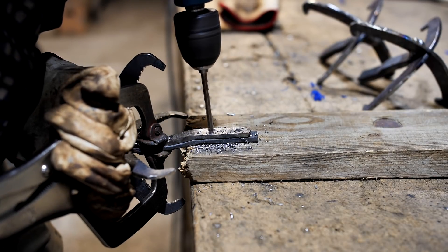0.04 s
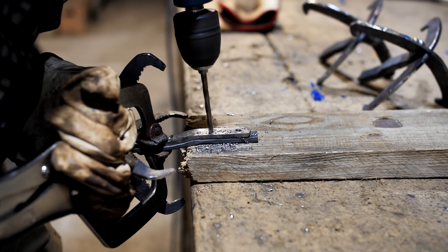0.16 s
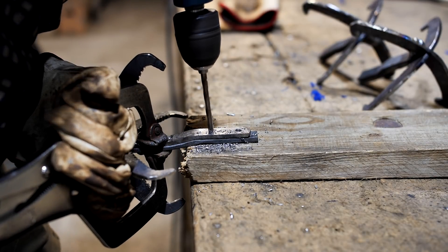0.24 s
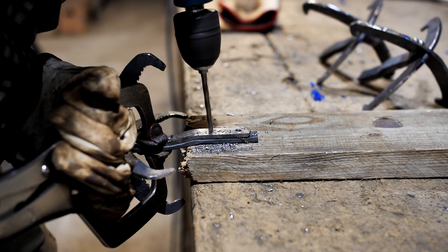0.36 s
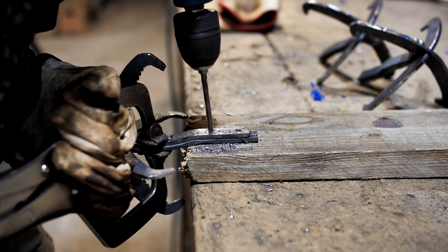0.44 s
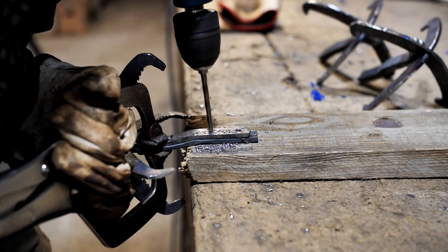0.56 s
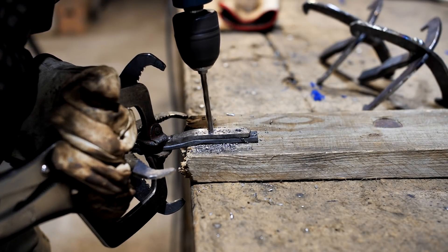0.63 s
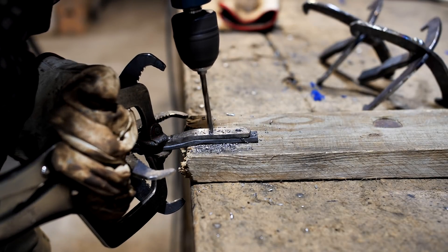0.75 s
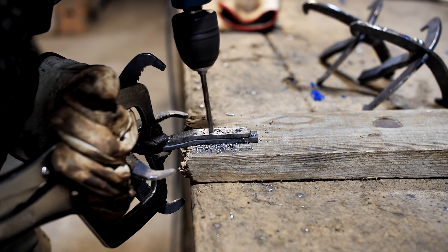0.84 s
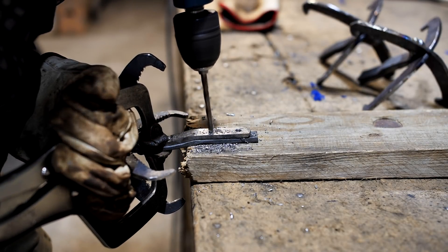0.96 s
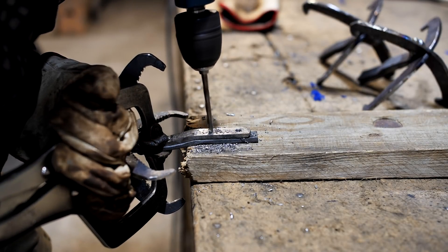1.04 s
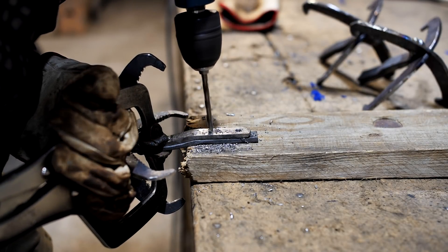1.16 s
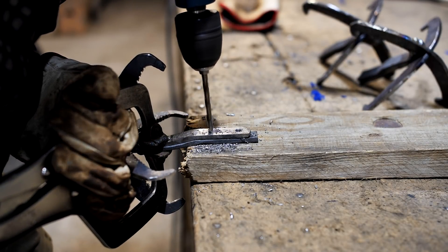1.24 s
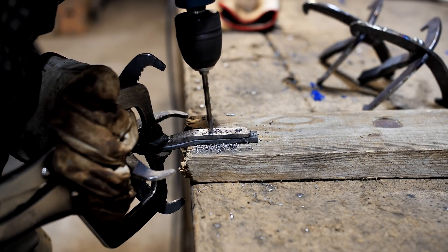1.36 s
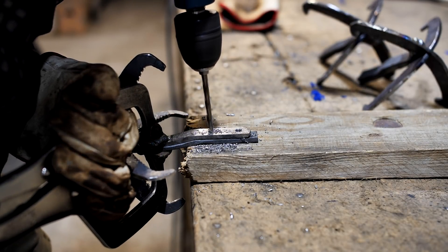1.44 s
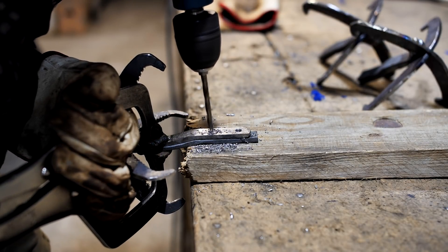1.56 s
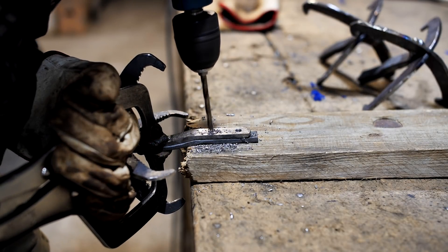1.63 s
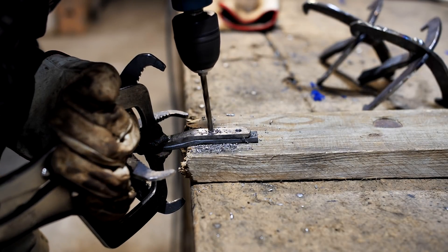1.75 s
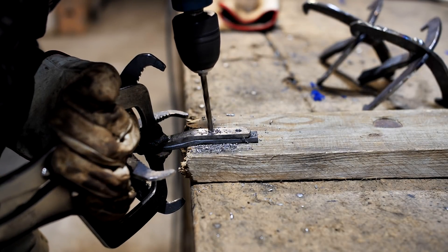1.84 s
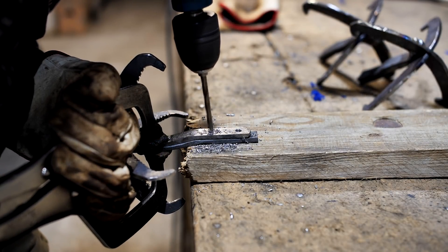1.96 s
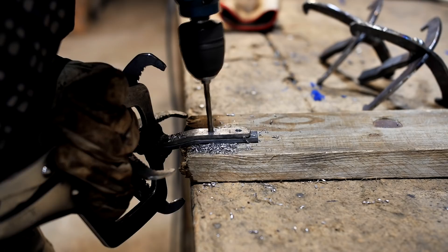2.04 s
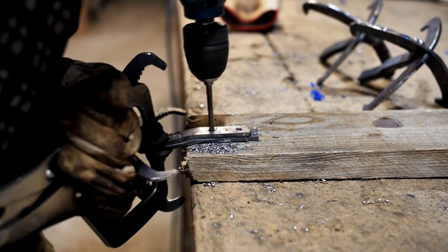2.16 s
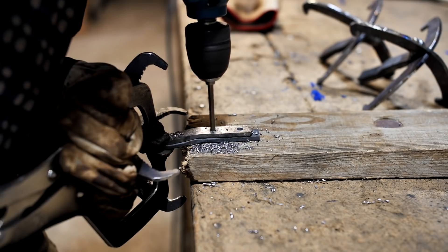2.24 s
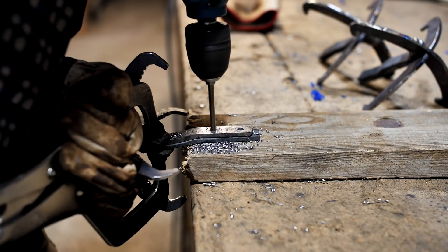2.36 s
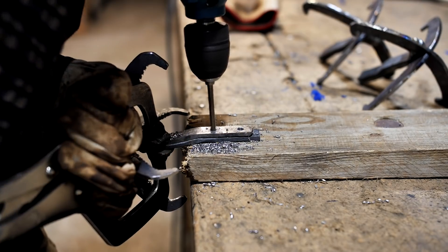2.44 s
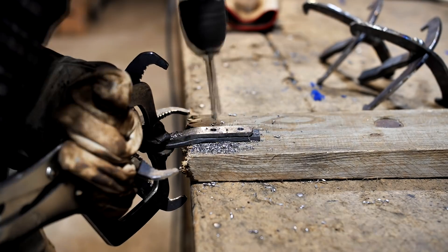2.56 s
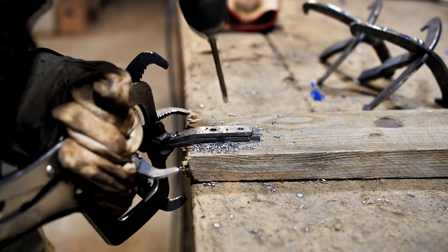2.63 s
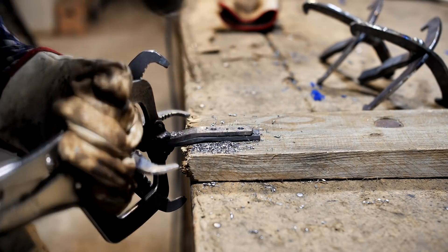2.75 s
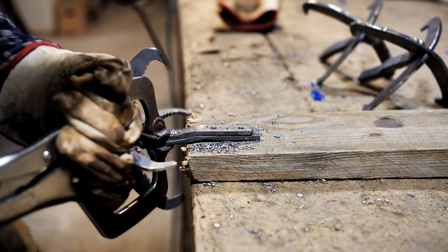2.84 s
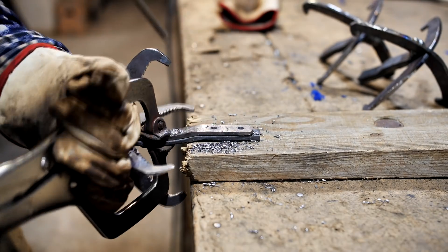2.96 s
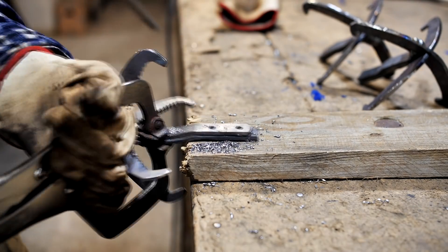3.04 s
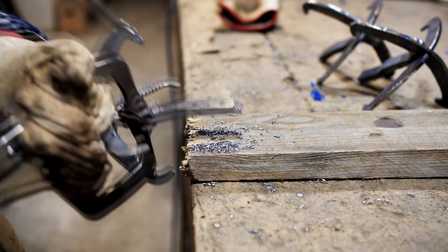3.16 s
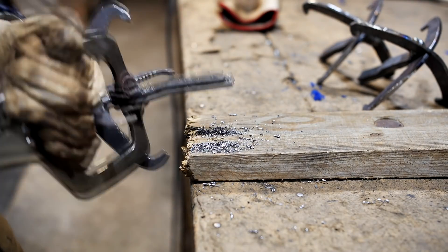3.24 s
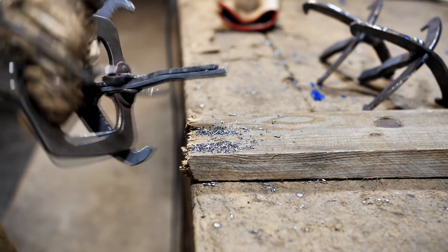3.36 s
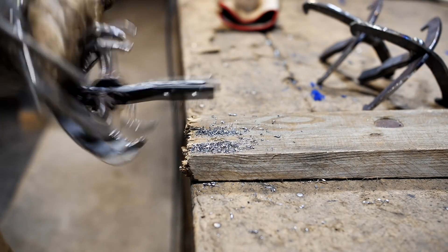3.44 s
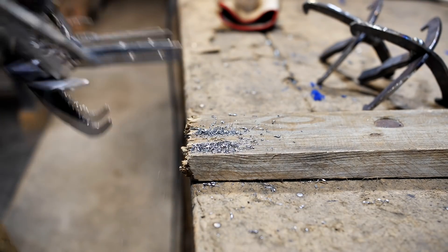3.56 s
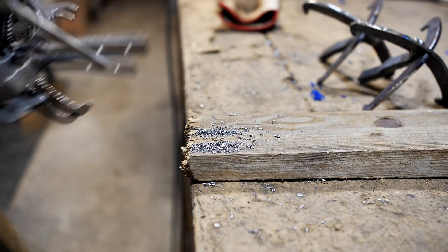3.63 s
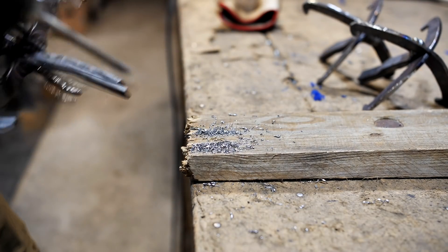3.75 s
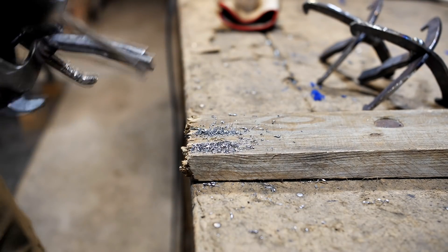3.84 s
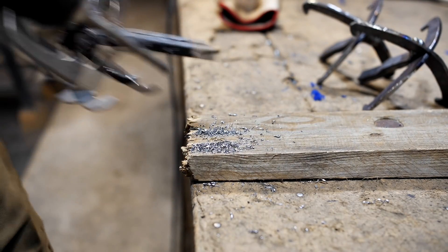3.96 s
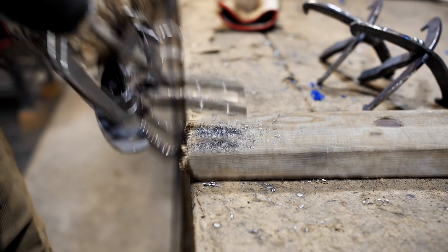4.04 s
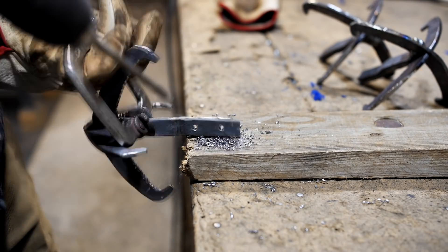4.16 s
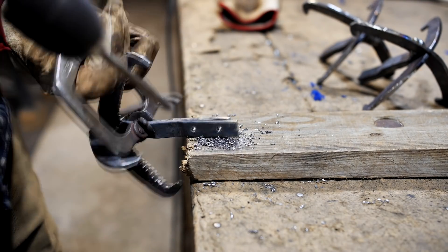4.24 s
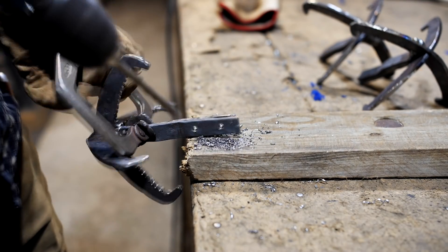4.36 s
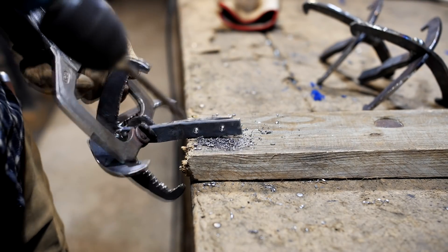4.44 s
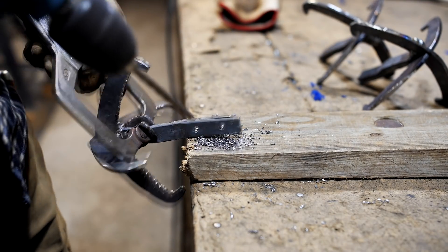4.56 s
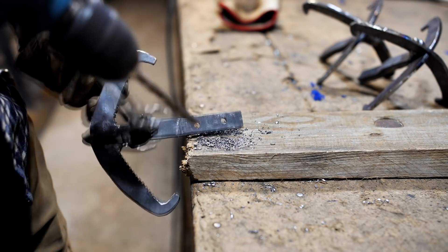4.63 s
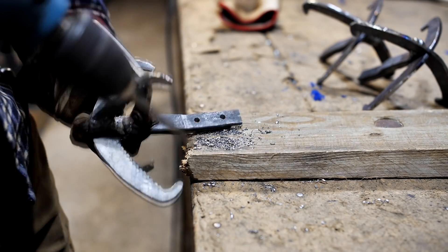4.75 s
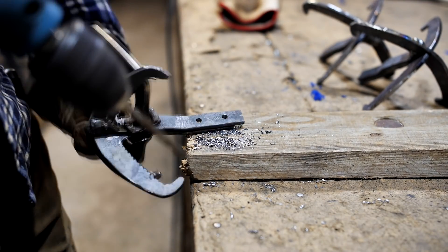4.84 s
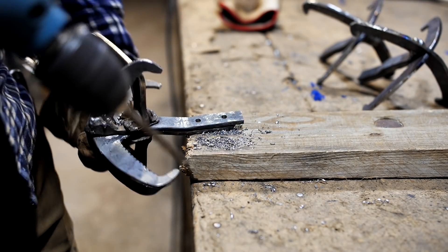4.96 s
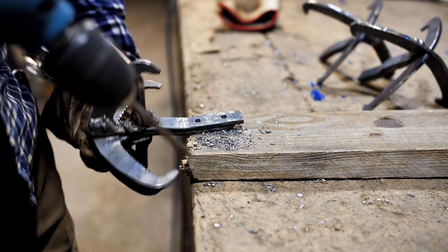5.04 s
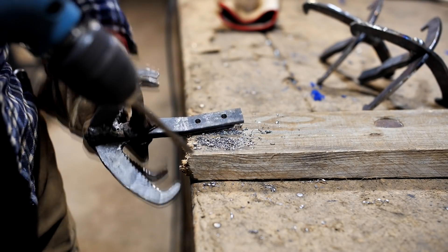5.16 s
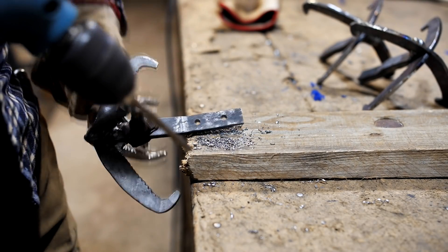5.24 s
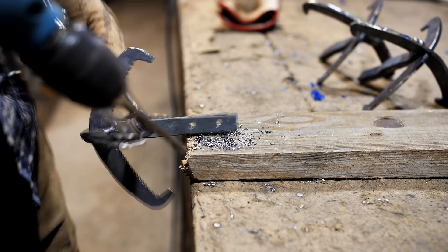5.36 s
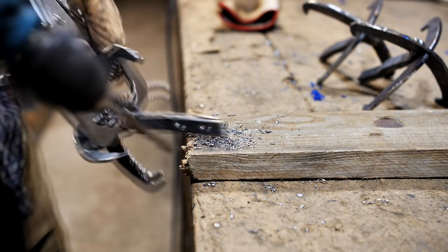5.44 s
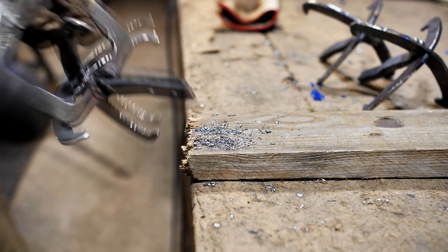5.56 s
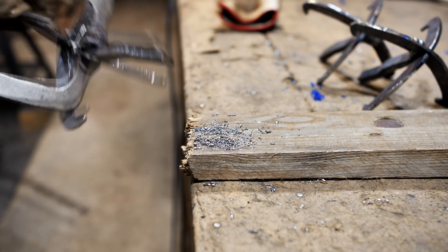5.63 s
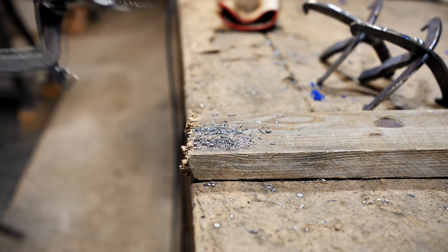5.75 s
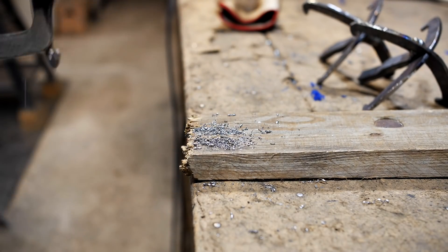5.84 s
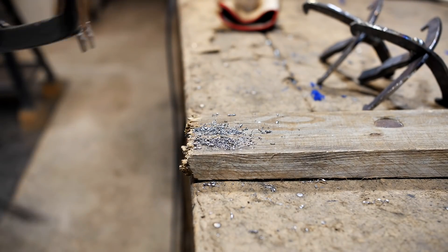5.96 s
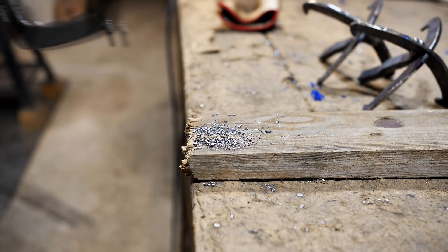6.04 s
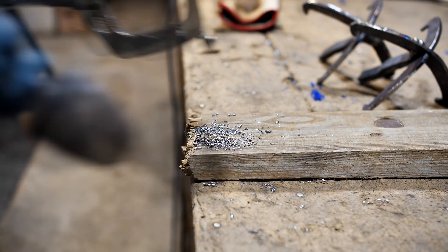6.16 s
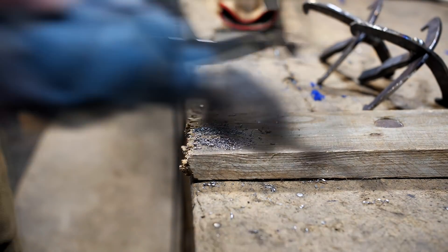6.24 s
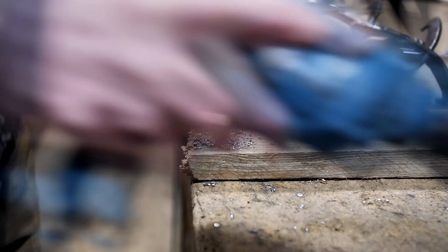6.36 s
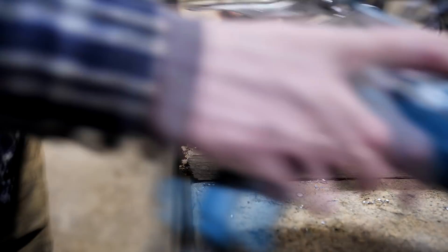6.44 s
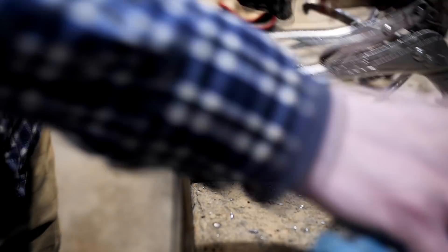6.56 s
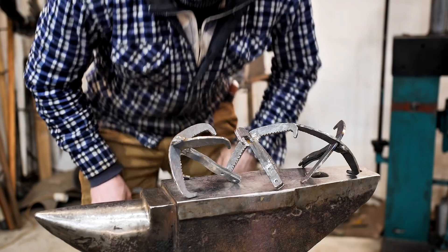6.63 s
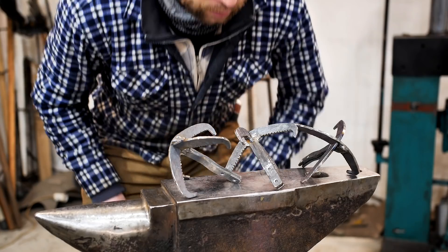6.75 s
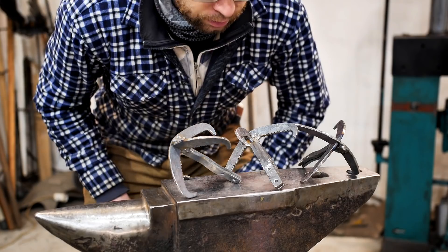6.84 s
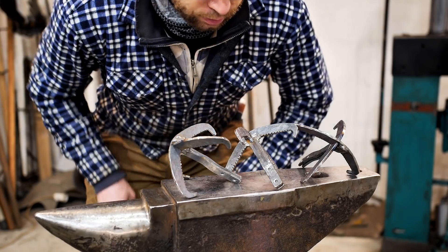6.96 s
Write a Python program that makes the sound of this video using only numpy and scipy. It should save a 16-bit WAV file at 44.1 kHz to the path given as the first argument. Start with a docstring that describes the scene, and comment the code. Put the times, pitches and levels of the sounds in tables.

```python
"""An electric hand drill bores through a steel strip held on a wooden bench, over a steady murmur and a low rumble.
First the gears whine and the bit grinds under load, with a brief moan as it takes hold; it breaks through and is lifted.
Then the drill coasts: the commutator sings a falling comb, loose gears rattle and the work is knocked onto the bench.
The last gear teeth drop as the motor stops; then a cut to the ringing, reverberant tail of a bang, and iron parts tick.
Modes and shaped noise make the impacts and friction, sums of sines the gear and commutator lines; one microphone."""
import sys
import numpy as np
from scipy import signal
from scipy.fft import rfft, irfft, next_fast_len
from scipy.io import wavfile
from scipy.ndimage import uniform_filter1d

SR = 44100
rng = np.random.default_rng(int(sys.argv[2]) if len(sys.argv) > 2 else 0)


def master_out(mix):
    """Clip the mix to full scale and print it as 16-bit PCM to the path in sys.argv[1]."""
    frames = np.transpose(np.atleast_2d(mix))
    ceiling = np.clip(frames, -1, 1)
    pcm = np.round(ceiling * 32767).astype(np.int16)
    wavfile.write(sys.argv[1], SR, pcm)


N = 308695
T = np.arange(N) / SR
TOP_HZ = 15740  # upper limit of the recorded band

# Workshop murmur: (frequency [Hz], level per Hz [dB])
SHOP_SPECTRUM = [(53, -28), (90, -50), (125, 2.5), (805, -1), (1580, -10.5), (2060, -11.5), (2480, -14.5),
                 (4050, -24), (12000, -33.5), (15600, -70), (22000, -120)]
SHOP_DB = -54.5
# Swells of the low rumble: (time [s], rise [s], fall [s], level [dB])
RUMBLE_SWELLS = [(0.68, 0.14, 0.31, -53), (1.019, 0.062, 0.19, -50), (1.69, 0.091, 0.11, -55),
                 (2.49, 0.09, 0.13, -43), (3.04, 0.044, 0.041, -44), (4.21, .05, .1, -47),
                 (5.69, .06, 0.046, -65), (6.26, 0.045, 0.11, -55.5)]
RUMBLE_DB, RUMBLE_WAVER_DB = -57.5, 4

# Gear whine under load: (time [s], main line [Hz], level [dB])
WHINE_COURSE = [(0.0, 417.7, -40.5), (0.1, 439.5, -37), (0.2, 457, -31), (0.28, 445, -58),
                (0.33, 446.3, -42), (0.37, 489, -38), (0.44, 495.4, -32.5), (0.8, 481.4, -33),
                (1.12, 481, -34), (1.15, 466, -34.5), (1.3, 447.5, -35), (1.5, 431.3, -29.5),
                (1.6, 421.6, -34), (1.8, 413.5, -32), (1.9, 426.8, -31.5), (1.95, 463, -33),
                (2.0, 486.4, -31.5), (2.05, 501, -30), (2.075, 553.5, -28), (2.13, 535.5, -20),
                (2.155, 469.3, -30), (2.2, 411.6, -37.5), (2.255, 403.3, -32), (2.27, 618.7, -30),
                (2.35, 723, -30.5), (2.43, 733, -37), (2.5, 686, -33), (2.62, 650, -42.5)]
# Whine lines as multiples of the main line: (multiple [1])
WHINE_MULTIPLES = (1, 2, 3, 5, 1.5, 2.5)
# Strength of each whine line: (level [dB])
WHINE_MULTIPLES_DB = (0, -3.5, -1, -15, -3.5, -5.5)
# Resonances of the gear case: (frequency [Hz], nominal width [Hz], level [dB])
CASE_MODES = [(414.6, 20, -1), (476, 35, -1.5), (581, 91, 2.5), (658, 74, -4.5), (694, 99, -17.5),
              (890, 51, -2), (929, 46, 5), (1182, 144, 1.5), (1212, 174, 5), (1406, 450, -1),
              (2198, 230, 11.5)]
FLUTE_TURNS, FLUTE_DEPTH = .12, .35  # flutes bite once in about eight whine cycles and make it beat
HALVES_UNTIL_S, HALVES_FADE_DB_PER_S = 0.47, -150  # every other tooth is louder until the bit has settled
GRIP_AT_S, LOOSE_DB = .32, -14  # the upper whole lines stay faint until the bit grips
BREAK_S, BREAK_LENGTH_S = 1.95, 0.2975  # the bit breaks through
WAVER, FREE_WAVER, BREAK_EXTRA_WAVER = 0.0036, .009, 0.01812  # pitch waver as a share: before, after, added
BREAK_UPPER_DB, GROWL_DB = -10, 4  # at breakthrough: upper lines weaken, the whine shudders fast
FREE_S, FREE_DB = 2.37, -9  # the bit spins free: the main line thins

# Bit cutting: (time [s], feed [dB], chatter of the strip [dB], chatter of the tool [dB])
FEED_COURSE = [(0.0, -41.5, -37, -35.5), (0.2, -41.5, -32, -34.5), (0.33, -35.5, -24.5, -27),
               (0.46, -37, -27, -28.5), (0.76, -37.5, -26, -27), (0.93, -36, -27, -28.5),
               (1.06, -37, -26.5, -26.5), (1.11, -37, -25, -27.5), (1.15, -38.5, -33.5, -32),
               (1.4, -37, -29.5, -31.5), (1.73, -36, -28.5, -33), (1.95, -35, -28, -30.5),
               (2.05, -36, -30.5, -30), (2.17, -39, -32.5, -35), (2.26, -35.5, -27.5, -29),
               (2.35, -36.5, -36, -31), (2.48, -36, -31, -31.5), (2.6, -37, -35, -34), (2.7, -47, -49, -47),
               (2.74, -46, -55, -54)]
# Resonances of the bench: (frequency [Hz], width [Hz], level [dB])
BENCH_MODES = [(213, 59, -9), (281, 35.5, 4.5), (441, 61, -4), (650, 126, -3.5)]
# Resonances of the bench legs: (frequency [Hz], width [Hz], level [dB])
LEG_MODES = [(86, 37, -10), (109.5, 27, 1.5), (187, 160, 1.5)]
# Resonances of the steel strip: (frequency [Hz], width [Hz], level [dB])
STRIP_MODES = [(900, 47, -14.5), (1158, 64, -6.5), (1253, 84, -2), (1363, 320, -2.5), (1960, 630, -2.5),
               (2120, 130, 0)]
# Resonances of the tool: (frequency [Hz], width [Hz], level [dB])
TOOL_MODES = [(3110, 580, -1), (3950, 196, 8.5), (4285, 226, 5), (5150, 120, -1), (5655, 59, -7)]
# Chip hiss: (frequency [Hz], level per Hz [dB])
HISS_SPECTRUM = [(3530, 1.5), (6000, 5.5), (6470, 1), (7040, 3), (8420, 0.5), (9260, -0.5), (10100, -2),
                 (10700, 0), (15100, -9), (15500, -18)]
# Resonances of the drill bit: (frequency [Hz], width [Hz], level [dB])
BIT_MODES = [(6890, 83, 6.5), (7800, 230, 2), (8360, 210, -12), (9100, 180, 5), (10570, 180, -3),
             (13400, 200, -9), (14800, 120, -7)]
BIT_DB = -9.5  # ring of the bit within the chip hiss
BENCH_DB, THROUGH_DB = 3.5, -3.5  # bench over the feed; its change once the bit is through
LEGS_DB, LEGS_DB_PER_S, LEGS_TOP_DB = -24.5, 15.5, -7.5  # over the feed: legs shake more as the hole deepens
LIFT_S, LIFT_DB_PER_S = 2.47, -130  # the bench falls silent as the drill is lifted

# Bit biting in: (time [s], frequency [Hz], level [dB])
GROAN_COURSE = [(.2, 240, -30), (.22, 248, -25), (.25, 335, -27), (.29, 335, -40)]

# Running down: (time [s], housing ring [dB], fan air over it [dB])
RUN_COURSE = [(2.62, -43.5, 2), (2.8, -33.5, -2.5), (3.1, -35.5, -8), (3.8, -38.5, -5.5), (4.3, -42, -5),
              (4.8, -45.5, -2), (4.92, -42.5, -2.5), (5.1, -47.5, -4), (5.5, -51, -3), (5.7, -56.5, -4),
              (6.0, -62, -8), (6.3, -80, -19)]
# Fits of loose gear rattle: (time [s], length [s], level [dB], chuck ring over it [dB])
RATTLE_FITS = [(2.722, 0.043, -38, 2), (2.763, 0.1, -45, 11), (2.874, 0.21, -38, 7),
               (3.067, 0.016, -43, -2), (3.133, 0.033, -37.5, -1), (3.157, 0.026, -37.5, 4),
               (3.187, 0.039, -47, -3), (3.328, .025, -38, -10), (3.35, 0.096, -34, 1),
               (3.454, 0.11, -33.5, 0.5), (3.57, 0.025, -42, -4), (3.615, .008, -37, 0),
               (3.656, 0.17, -33, 0), (3.822, 0.05, -39.5, -6), (3.868, .055, -32.5, -2),
               (3.963, 0.022, -43, 0), (3.977, 0.1, -33, -4.5), (4.086, 0.039, -36, -1),
               (4.172, 0.023, -36, -4), (4.217, 0.034, -41, -4), (4.249, 0.018, -31, -3.5),
               (4.277, 0.1, -37, -3), (4.398, 0.031, -35.5, -5), (4.433, 0.033, -31, -2.5),
               (4.474, 0.042, -38, -3), (4.519, .014, -30, -2), (4.542, 0.037, -33.5, -1.5),
               (4.6, 0.012, -32, -2), (4.64, 0.024, -32, -5), (4.663, 0.14, -38.5, -5.5),
               (4.817, .012, -44, -15), (4.861, 0.059, -41.5, -7), (4.916, 0.023, -39, -2),
               (4.938, 0.081, -40, -3.5), (5.03, 0.024, -40, -3), (5.069, 0.061, -45, -4),
               (5.129, 0.011, -40.5, 1), (5.164, 0.024, -43, -5), (5.231, 0.059, -43, -5.5),
               (5.345, 0.066, -45, 0), (5.43, 0.039, -47, -3), (5.465, 0.015, -45, 2),
               (5.487, 0.052, -47, 0.5), (5.578, 0.074, -53, 1), (5.67, 0.28, -63, -4), (5.9, 0.11, -72, 0)]
# Resonances of the gearbox: (frequency [Hz], width [Hz], level [dB])
GEARBOX_MODES = [(654, 104, -12), (937, 43, -7.5), (1250, 400, 2.5), (1367, 103, 5.5)]
# Resonances of the chuck: (frequency [Hz], width [Hz], level [dB])
CHUCK_MODES = [(1778, 240, 3), (1836, 87, 5.5), (2015, 184, 3.5), (2880, 2300, -7)]
# Resonances of the motor housing: (frequency [Hz], width [Hz], level [dB])
HOUSING_MODES = [(2550, 330, -3), (3300, 1430, 9.5), (3910, 260, 11), (4190, 170, 6.5), (4767, 200, 8),
                 (5510, 730, 8)]
# Fan air: (frequency [Hz], level per Hz [dB])
FAN_SPECTRUM = [(3530, -1), (6000, -25), (6580, 7), (7830, 7), (9370, 1.5), (10300, 1), (13000, -4),
                (15500, -6)]
FIT_EDGE_S, FIT_HOUSING_DB = 0.011, -5  # slope of a fit's ends; housing ring in a fit, over the gears
IDLE_DB, IDLE_CHUCK_DB = -6.5, -5  # gears and chuck between fits, over the housing ring

# Colour of the commutator lines: (frequency [Hz], level [dB])
COMB_COLOUR = [(1500, -30), (2800, -13), (3300, -8), (3650, -3), (4000, 1), (4300, -3), (4600, -4),
               (4950, 1.5), (5250, -1), (5600, -4), (5950, -11), (6300, -8), (6800, -14), (7200, -10),
               (7650, -6), (8100, -10), (8800, -15), (11500, -22), (14000, -29)]
# First multiples of the bar rate, in order: (level [dB])
FIRST_LINES_DB = (0, -4, 0, 1, -5, -3, -7, -1, -5, -4)
HIGH_LINES_DB, COMB_DB = -4, 2.5  # the higher multiples; the whole comb over the housing ring
# Bar rate after switch-off: air drag slows in proportion to speed, bearings steadily, the hole grips at first
OFF_S, DRAG_HZ, DRAG_S, BEARING_HZ, GRIP_HZ, GRIP_S = 2.43, 4784, 7.19, 2779, 200, .144
# Lines above this frequency gain on the rest as the speed halves
SPARK_HZ, SPARK_DB_PER_OCTAVE, SPARK_TOP_DB = 6000, 3, 4
BLUR_HZ = 300  # below this bar rate the lines sink into the hiss

# Work set down on the bench: (time [s], nominal level [dB], push [ms], judder t60 [s])
BENCH_KNOCKS = [(4.121, -15.5, 0.14, 0.075), (4.150, -20, 0.66, 0.14), (4.163, -24, 0.39, 0.085),
                (4.179, -18, 0.27, 0.06), (4.197, -19, 1.4, 0.13), (4.229, -20, 3.1, 0.13),
                (4.764, -32.5, 2.8, 0.26), (5.461, -35, 3.1, 0.13)]
# Modes of the plank: (frequency [Hz], level [dB], t60 [s])
PLANK_MODES = [(190, -21, 0.05), (310, -3, 0.025), (385, -4.5, 0.056), (546, 5, 0.016), (650, -6, 0.031),
               (886, 5.5, 0.019), (1120, 2, 0.018), (1810, -10, 0.021), (3090, -2, 0.016)]

# Last gear teeth dropping as the motor stops: (time [s], nominal level [dB])
TOOTH_DROPS = [(6.1853, -40), (6.195, -43), (6.2055, -60), (6.3103, -36), (6.3175, -36), (6.3474, -42),
               (6.3744, -47), (6.4172, -36.5), (6.4522, -44), (6.4824, -43), (6.503, -32.5), (6.5195, -39),
               (6.5263, -35), (6.5715, -45), (6.6303, -45)]
# Modes struck by a tooth: (frequency [Hz], level [dB], t60 [s])
TOOTH_MODES = [(1400, -4, .006), (2050, 0, .009), (2900, -2, .005), (3500, -2, .005), (4150, 0, .009),
               (5000, -1, .005), (5700, -1, .008)]

# Colour of the bang's tail: (frequency [Hz], level per Hz [dB])
TAIL_SPECTRUM = [(47, -50), (80, -24), (246, -10.5), (294, -16), (409, -4.5), (545, -14.5), (650, -9),
                 (865, -19.5), (1200, -12.5), (2200, -18), (3700, -19.5), (6000, -28.5), (15500, -46.5)]
# Decay of the hall: (frequency [Hz], t60 [s])
HALL_DECAY = [(200, 1.0), (800, 1), (3000, 1), (9000, 0.99)]
# Ringing iron: (frequency [Hz], level [dB], t60 [s])
IRON_MODES = [(236, 0, 0.9), (420, -17, 0.41), (646, 8, 0.23), (1026, -1, 0.83), (1185, 1.5, 0.94),
              (1200, -20, .5), (1710, -12, 0.86), (1780, 0, 0.79), (1890, -14, 0.69)]
TAIL_S, TAIL_DB, IRON_DB = 6.664, -33, -38.5
EARLY_DB, EARLY_T60_S = 10, 0.12  # first echoes above the tail; time for this dB excess to shrink 1000-fold

# Iron parts touching: (time [s], nominal level [dB], ring [Hz], length [ms])
IRON_TICKS = [(6.8873, -18, 3800, 1.95), (6.9183, -23, 1270, 2.3), (6.9233, -35, 900, 3.6),
              (6.9474, -32, 1760, 3.6)]

ROOM_DB, ROOM_T60_S = -12, 0.64


def undb(db):
    """Level definition: decibels to an amplitude ratio."""
    return 10 ** (np.asarray(db) / 20)


def unit(x):
    """Normalisation to a root-mean-square of 1."""
    return x / np.sqrt(np.mean(x ** 2))


def curves(table):
    """Linear interpolation of a table's columns over time, and a gate that is open while the table lasts."""
    s, *columns = np.transpose(table)
    opening = T - s[0] + .02 * (s[0] < .01)  # already open if the table starts with the sound
    gate = np.clip(np.minimum(opening, s[-1] - T) / .02, 0, 1)
    return [np.interp(T, s, c) for c in columns] + [gate]


def span(s, length, edge):
    """Trapezoidal window: 1 for a stretch of time, with sloping ends."""
    return np.clip(np.minimum(T - s, s + length - T) / edge + .5, 0, 1)


def onward(s, edge):
    """Ramp function: 0 before a moment, 1 from then on, with a sloping rise."""
    return np.clip((T - s) / edge + .5, 0, 1)


def walk(rate):
    """Smoothed random process: levels held 1 / rate s, then averaged twice over the same time."""
    k = int(SR / rate)
    held = np.repeat(rng.standard_normal(N // k + 1), k)
    return 1.543 * uniform_filter1d(uniform_filter1d(held, k), k)[:N]


def grit(rate, spread_db, smooth):
    """Shot noise of friction: random clicks of uneven size over a share of smooth noise."""
    when, size, noise = rng.random(N), rng.exponential(size=N), rng.standard_normal(N)
    clicks = (when < rate / SR) * np.sign(noise) * undb(spread_db * np.minimum(size, 4))
    return unit(clicks) + smooth * noise


def resonate(x, modes):
    """Forced resonance: a sum of band-passes with alternating signs, scaled to rms 1."""
    out = 0
    for k, (hz, width, db) in enumerate(modes):
        band = signal.lfilter(*signal.iirpeak(hz, hz / width, SR), x)
        out = out + (-1) ** k * undb(db) / np.sqrt(width) * band
    return unit(out)


def ring(x, modes):
    """Free vibration: exponentially decaying modes struck by x."""
    out = 0
    for hz, db, t60 in modes:
        pole = np.exp(2j * np.pi * hz / SR - np.log(1000) / (t60 * SR))
        out = out + undb(db) * signal.lfilter([1], [1, -pole], x).imag
    return out


def colour(x, spectrum):
    """Spectral shaping: weights each frequency by (Hz, dB) points, scaled to rms 1."""
    hz, db = np.transpose(spectrum)
    size = next_fast_len(N)
    bins_hz = np.arange(1, size // 2 + 2) * SR / size
    gain = undb(np.interp(np.log(bins_hz), np.log(hz), db))
    return unit(irfft(rfft(x, size) * gain, size)[:N])


def shop():
    """Filtered noise: a dull, slowly wavering murmur of the building and a rumble near 50 Hz that swells."""
    swells = 0
    for s, rise, fall, db in RUMBLE_SWELLS:
        swells = swells + undb(db) * np.exp(-((T - s) / np.where(T < s, rise, fall)) ** 2)
    rumble = resonate(resonate(rng.standard_normal(N), [(48.6, 15, 0)]), [(49.2, 10.5, 0)])
    rumble_gain = undb(RUMBLE_DB + RUMBLE_WAVER_DB * walk(5.26)) + swells
    murmur = undb(SHOP_DB + 2.0 * walk(4)) * colour(rng.standard_normal(N), SHOP_SPECTRUM)
    return murmur + rumble_gain * rumble


def whine():
    """Tooth meshing and resonance: lines follow the load, swell at modes of the case, waver most at breakthrough."""
    live = T < WHINE_COURSE[-1][0]
    t, (hz, level_db, gate) = T[live], np.array(curves(WHINE_COURSE))[:, live]
    breaking = span(BREAK_S, BREAK_LENGTH_S, 0.038)[live]
    waver = np.where(t > BREAK_S, FREE_WAVER, WAVER) + BREAK_EXTRA_WAVER * breaking
    phase = 2 * np.pi * np.cumsum(hz * (1 + waver * walk(60)[live])) / SR
    flutter_db = 1.2 + 150 * waver
    beat = 1 + FLUTE_DEPTH * np.sin(FLUTE_TURNS * phase + walk(12)[live])

    halves_db = HALVES_FADE_DB_PER_S * np.maximum(t - HALVES_UNTIL_S, 0)
    upper_db = BREAK_UPPER_DB * breaking + LOOSE_DB * (1 - onward(GRIP_AT_S, .05)[live])
    main_db = FREE_DB * onward(FREE_S, .06)[live]
    lines = 0
    for k, db in zip(WHINE_MULTIPLES, WHINE_MULTIPLES_DB):
        case = 0
        for f, width, top_db in CASE_MODES:
            detuning = 2 * (k * hz - f) / (1.715 * width)
            case = case + undb(top_db) / (1 + detuning ** 2) ** 2
        fade_db = halves_db if k % 1 else upper_db if k > 1 else main_db
        lines = lines + case * undb(db + fade_db + flutter_db * walk(34.7)[live]) * np.sin(k * phase)

    growl_db = GROWL_DB * breaking * walk(160)[live]
    out = np.zeros(N)
    out[live] = gate * beat * np.sqrt(2) * undb(level_db + growl_db) * lines
    return out


def cutting():
    """Intermittent fracture: chips tear off in uneven bursts and shake bench, strip, tool and bit."""
    feed_db, strip_db, tool_db, gate = curves(FEED_COURSE)
    tear = grit(1500, 2.4, 0.96) * undb(0.63 * walk(44.77) + 1.05 * walk(170))
    fine = 0.77 * tear + rng.standard_normal(N)
    # time reversal gives the bit's ring a drive unlike that of the hiss
    hiss = colour(fine, HISS_SPECTRUM) + undb(BIT_DB) * resonate(fine[::-1], BIT_MODES)

    bench_db = BENCH_DB + THROUGH_DB * onward(BREAK_S + 0.03, .06)
    legs_db = np.minimum(LEGS_DB + LEGS_DB_PER_S * T, LEGS_TOP_DB)
    bench = undb(bench_db) * resonate(tear, BENCH_MODES) + undb(legs_db) * resonate(tear, LEG_MODES)
    bench = bench * undb(LIFT_DB_PER_S * np.maximum(T - LIFT_S, 0))

    steel = undb(strip_db) * resonate(tear, STRIP_MODES) + undb(tool_db) * resonate(tear, TOOL_MODES)
    return gate * (undb(feed_db) * (bench + hiss) + steel)


def groan():
    """Frequency glide of a sine: a short rising moan as the bit takes hold."""
    hz, db, gate = curves(GROAN_COURSE)
    return gate * undb(db) * np.sin(2 * np.pi * np.cumsum(hz) / SR)


def coasting():
    """Impacts across backlash: unloaded teeth clatter in fits while fan and brushes fade."""
    housing_db, fan_db, gate = curves(RUN_COURSE)
    clatter = grit(1100, 2.3, .8) * undb(1.1 * walk(90))
    air = clatter + 0.25 * rng.standard_normal(N)
    wind = 0.87 * clatter + rng.standard_normal(N)

    run = undb(housing_db)
    each_fit = np.array([undb(db) * span(s, length, FIT_EDGE_S) for s, length, db, _ in RATTLE_FITS])
    fits = each_fit.sum(axis=0)
    chuck_fits = undb(np.transpose(RATTLE_FITS)[-1]) @ each_fit

    gears = (fits + undb(IDLE_DB) * run) * resonate(clatter, GEARBOX_MODES)
    chuck_ring = resonate(resonate(clatter, [(1770, 1400, 0)]), CHUCK_MODES)
    chuck = (chuck_fits + undb(IDLE_CHUCK_DB) * run) * chuck_ring
    housing = (run + undb(FIT_HOUSING_DB) * fits) * resonate(air, HOUSING_MODES)
    fan = run * undb(fan_db) * colour(wind, FAN_SPECTRUM)
    brushes = run * undb(COMB_DB) * commutator()
    return gate * (gears + chuck + housing + fan + brushes)


def commutator():
    """Periodic excitation: brushes cross the bars and give multiples of the bar rate, coloured by the housing."""
    live = (T > RUN_COURSE[0][0]) & (T < RUN_COURSE[-1][0])
    age = T[live] - OFF_S
    bar_hz = DRAG_HZ * np.exp(-age / DRAG_S) - BEARING_HZ + GRIP_HZ * np.exp(-age / GRIP_S)
    bar_hz = np.maximum(bar_hz, 60)
    phase = 2 * np.pi * np.cumsum(bar_hz) / SR

    f, db = np.transpose(COMB_COLOUR)
    spark_db = np.minimum(SPARK_DB_PER_OCTAVE * np.log2(1100 / bar_hz), SPARK_TOP_DB)
    lines = 0
    for k, start in enumerate(2 * np.pi * rng.random(44), 1):
        line_hz = k * bar_hz
        # each line flickers, the high ones most
        flicker_db = min(.6 + .45 * k, 3.6) * walk(26)[live]
        order_db = FIRST_LINES_DB[k - 1] if k <= len(FIRST_LINES_DB) else HIGH_LINES_DB
        line_db = np.interp(np.log(line_hz), np.log(f), db) + flicker_db + order_db
        line_db = line_db + (line_hz > SPARK_HZ) * spark_db
        lines = lines + (line_hz < TOP_HZ) * undb(line_db) * np.sin(k * phase + start)

    out = np.zeros(N)
    out[live] = lines * (bar_hz / 1500) ** .2 * np.minimum(bar_hz / BLUR_HZ, 1)
    return out


def knocks():
    """Impulse response: a push and the judder after it ring the plank; a longer push is duller."""
    force, t = np.zeros(N), T[:6000]
    shakes = rng.standard_normal((len(BENCH_KNOCKS), 6000))
    for (s, db, ms, t60), shake in zip(BENCH_KNOCKS, shakes):
        push = np.hanning(int(ms * SR / 1000) + 3)
        judder = (t == 0) + 0.18 * shake * 1000 ** (-t / t60)
        blunted = np.convolve(judder, push / push.sum())[:6000]
        force[int(s * SR):][:6000] += 0.34 * undb(db) * blunted
    high_pass = signal.butter(2, 130, "high", fs=SR, output="sos")
    return signal.sosfilt(high_pass, ring(force, PLANK_MODES))


def teeth():
    """Modal excitation: each dropping tooth scrapes briefly into the housing, which muffles the top."""
    force = np.zeros(N)
    for (s, db), scrape in zip(TOOTH_DROPS, rng.standard_normal((len(TOOTH_DROPS), 200))):
        force[int(s * SR):][:200] += 0.05 * undb(db) * scrape * np.exp(-T[:200] / 0.0024)
    muffle = signal.butter(4, 6300, fs=SR, output="sos")
    return signal.sosfilt(muffle, ring(force, TOOTH_MODES))


def bang_tail():
    """Free vibration and reverberation: the tail of a bang, ringing iron in a dense decaying hall."""
    age = np.maximum(T - TAIL_S, 0)
    noise = colour(rng.standard_normal(N) * undb(2.0 * walk(87)), TAIL_SPECTRUM)
    middles = [np.sqrt(a[0] * b[0]) for a, b in zip(HALL_DECAY, HALL_DECAY[1:])]
    edges = [30] + middles + [TOP_HZ]
    tail = 0
    for k, (_, t60) in enumerate(HALL_DECAY):
        band = signal.butter(1, edges[k:k + 2], "band", fs=SR, output="sos")
        tail = tail + signal.sosfiltfilt(band, noise) * 1000 ** (-age / t60)
    early = undb(EARLY_DB * 1000 ** (-age / EARLY_T60_S))
    onset = np.minimum(age / 0.0094, 1)
    impulse = np.diff((T >= TAIL_S) * 1., prepend=0)  # starts the iron modes
    return undb(TAIL_DB) * tail * onset * early + undb(IRON_DB) * ring(impulse, IRON_MODES)


def ticks():
    """Inharmonic partials: each touch is a short burst of ring with two overtones and a crack."""
    out = np.zeros(N)
    for (s, db, hz, ms), noise in zip(IRON_TICKS, rng.standard_normal((len(IRON_TICKS), 400))):
        t = T[:int(ms * SR / 1000)]
        turn = 2 * np.pi * hz * t
        tone = np.sin(turn) + .3 * np.sin(1.45 * turn) + 0.091 * np.sin(2.11 * turn)
        crack = 0.78 * uniform_filter1d(noise, size=8)[:len(t)]
        out[int(s * SR):][:len(t)] += undb(db) * (tone + crack) * np.hanning(len(t)) ** .6
    return out


def scene():
    """Superposition: close sources with a short room behind them, the bang's tail and the murmur."""
    near = whine() + cutting() + groan() + coasting() + knocks() + teeth() + ticks()
    t = T[:SR // 3]
    echo = rng.standard_normal(len(t)) * 1000 ** (-t / ROOM_T60_S) * (t > .005)
    wet = signal.fftconvolve(near, echo / np.linalg.norm(echo))[:N]
    mono = near + undb(ROOM_DB) * wet + bang_tail() + shop()
    return np.array([mono, mono])


def record(dry):
    """Band limitation: the recorder cuts the top."""
    return signal.sosfilt(signal.ellip(14, .3, 70, TOP_HZ, fs=SR, output="sos"), dry)


dry = scene()
out = record(dry)
master_out(out)
```